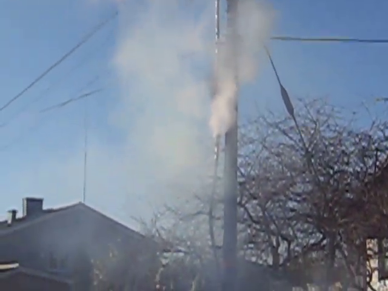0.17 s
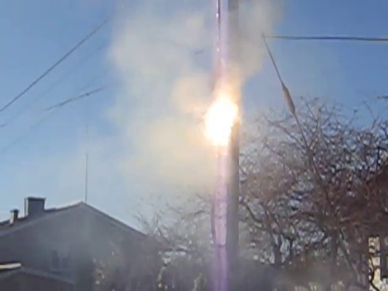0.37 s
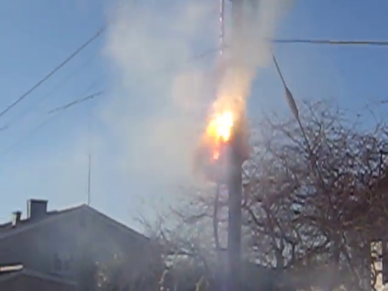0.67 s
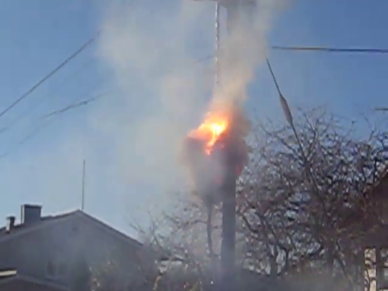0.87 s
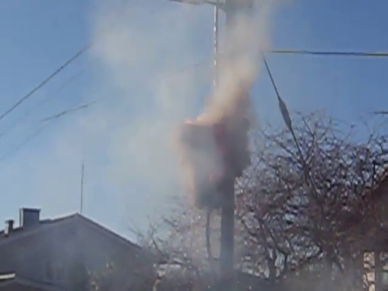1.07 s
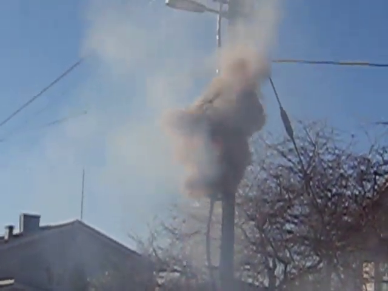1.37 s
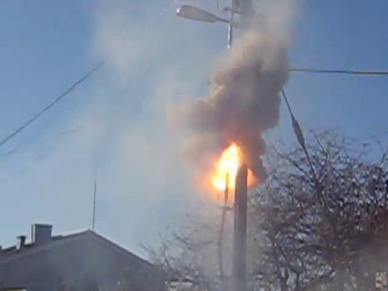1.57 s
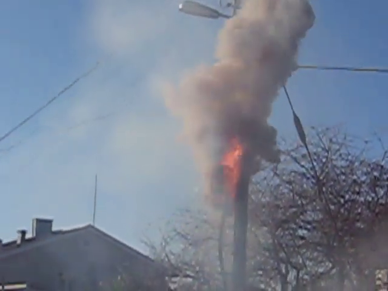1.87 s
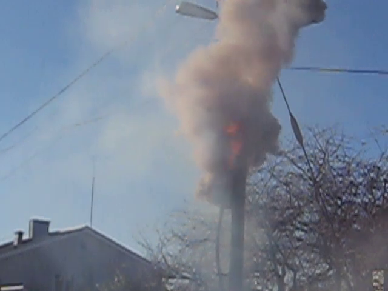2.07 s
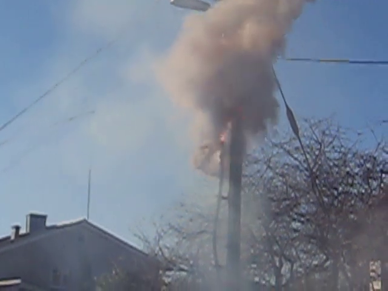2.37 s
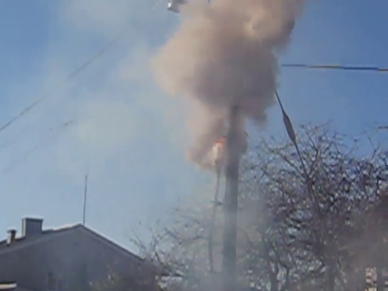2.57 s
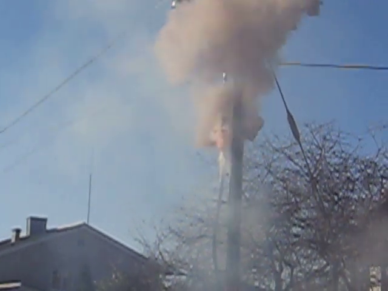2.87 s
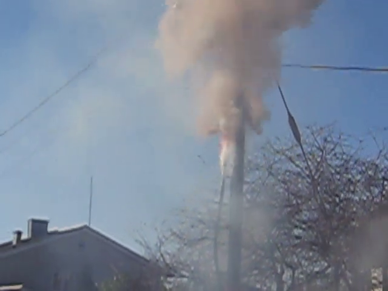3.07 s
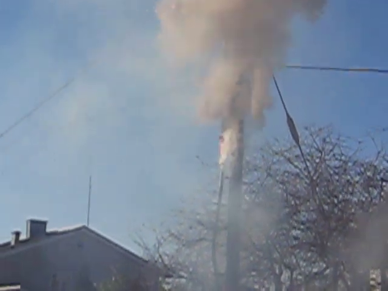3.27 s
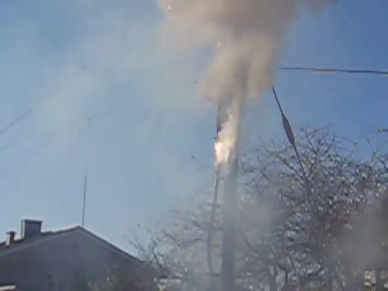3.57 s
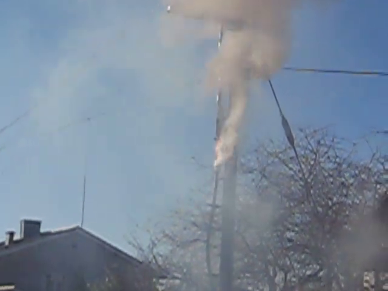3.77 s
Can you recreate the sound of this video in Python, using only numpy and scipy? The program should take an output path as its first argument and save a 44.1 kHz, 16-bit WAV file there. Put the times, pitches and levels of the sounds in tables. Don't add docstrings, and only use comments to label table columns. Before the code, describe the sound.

Loud arcing bursts outdoors: a bang and ragged spark sputter, a hissing gap, a second burst, fading gas and dry clicks, then a last fizzing pop with pings; distorted microphone ducks after bangs.

```python
import sys
import numpy as np
from scipy import signal
from scipy.fft import rfft, irfft
from scipy.io import wavfile
from scipy.ndimage import uniform_filter1d

SR = 44100
rng = np.random.default_rng(int(sys.argv[2]) if len(sys.argv) > 2 else 0)


def rack_gain(trim_db):
    fader = np.asarray(trim_db, float)
    return 10 ** (fader / 20)


def persist_wave(psi):
    counts = np.round(np.clip(psi, -1, 1) * 32767).astype(np.int16)
    wavfile.write(sys.argv[1], SR, np.atleast_2d(counts).T)


N = 172872


def rms_one(x):
    return x / np.sqrt(np.mean(x ** 2) + 1e-20)


def curve(rows):
    time_s, level_db = np.transpose(rows)
    return rack_gain(np.interp(np.arange(N) / SR, time_s, level_db))


def colour(x, spectrum):
    freq_hz, density_db = np.transpose(spectrum)
    size = 2 ** 13
    log_freq = np.log(np.fft.rfftfreq(size, 1 / SR) + 1)
    log_gain = np.interp(log_freq, np.log(freq_hz), density_db) * np.log(10) / 20
    cepstrum = irfft(log_gain)
    cepstrum[1:size // 2] *= 2
    cepstrum[size // 2 + 1:] = 0
    impulse = irfft(np.exp(rfft(cepstrum)))
    return signal.fftconvolve(x, impulse)[:N]


def butter(x, order, hz, kind="low"):
    return signal.sosfilt(signal.butter(order, hz, kind, fs=SR, output="sos"), x)


def lag_pole(x, tau_s):
    r = np.exp(-1 / (max(tau_s, 1e-4) * SR))
    return signal.lfilter([1 - r], [1, -r], x)


def drift(rate_hz):
    tau_s = 1 / (2 * np.pi * rate_hz)
    return rms_one(lag_pole(lag_pole(rng.standard_normal(N), tau_s), tau_s))


def ring(clicks, hz, t60_s):
    r = rack_gain(-60 / (t60_s * SR))
    w = 2 * np.pi * hz / SR
    return signal.lfilter([0, np.sin(w)], [1, -2 * r * np.cos(w), r * r], clicks + 1e-18)


def resonate(x, peaks):
    out = 0
    for k, (hz, width_hz, db) in enumerate(peaks):
        r = np.exp(-np.pi * width_hz / SR)
        zeros = [(1 - r * r) / 2, 0, (r * r - 1) / 2]
        poles = [1, -2 * r * np.cos(2 * np.pi * hz / SR), r * r]
        out = out + (-1) ** k * rack_gain(db) * signal.lfilter(zeros, poles, x)
    return out


def grains(per_s, spread_db):
    sizes = rack_gain(spread_db * np.minimum(rng.exponential(1, N), 3.5)) * rng.choice([-1, 1], N)
    return rms_one(sizes * (rng.random(N) < per_s / SR))


def late(x, lag_ms):
    n = np.arange(N)
    return np.interp(n - lag_ms * SR / 1000, n, x)


def swells(rows):
    t, out = np.arange(N) / SR, np.ones(N)
    for start_s, db, length_s in rows:
        attack = np.clip((t - start_s) / length_s * 8, 0, 1)
        decay = np.exp(-(np.clip(t - start_s, 0, 1) / length_s) ** 2)
        out += rack_gain(db) * attack * decay
    return out


def street():
    # freq_hz, density_db (per Hz)
    street_colour = [(40, -7.5), (400, -2), (700, 0.5), (3000, -8), (3700, -15.5), (7700, -20.5),
                     (11800, -30.5), (13000, -41)]
    # pitch_hz, width_hz, level_db
    engine_band = (2550, 400, -40)
    # multiple of the firing rate, level_db (rms)
    orders = [(2, -45), (3, -46.5), (4, -70), (13, -46), (22, -46)]
    firing_hz, throb_depth = 23.34, 0.2
    tick_first_s, tick_s, tick_db = .0144, .014, -49
    t = np.arange(N) / SR
    turn = 2 * np.pi * firing_hz * t + 0.15 * drift(3.0)

    noise = rack_gain(-28) * rms_one(colour(rng.standard_normal(N), street_colour))
    noise += rack_gain(engine_band[2]) * rms_one(resonate(rng.standard_normal(N), [engine_band]))
    out = rack_gain(1.28 * drift(44)) * (1 + throb_depth * np.cos(turn)) * noise
    for order, db in orders:
        out += rack_gain(db + 1 + 1.5 * drift(2.2)) * np.sin(order * turn + rng.uniform(0, 2 * np.pi))

    since_tick = (t - tick_first_s) % (4 / firing_hz)
    valve = rms_one(resonate(rng.standard_normal(N), [(7000, 250, 0)]))
    tick = rack_gain(tick_db) * np.exp(-(since_tick / tick_s) ** 2) * valve
    whine = rack_gain(-53) * rms_one(resonate(rng.standard_normal(N), [(7558, 10, 0)]))
    return out + tick + whine


def gas():
    # time_s, level_db
    hiss_level = [(0, -68), (.4, -75), (.45, -10), (1.2, -13), (1.26, -10), (1.29, -8), (1.34, -10.5),
                  (1.45, -10), (1.8, -15), (1.88, -15.5), (1.94, -14), (2.0, -13), (2.08, -17.5),
                  (2.17, -19), (2.23, -22.5), (2.29, -27), (2.5, -33), (2.8, -38.5), (3.92, -70)]
    # freq_hz, density_db (per Hz)
    hot_colour = [(180, -40), (300, -21), (842, -9), (1640, -5), (3400, 1), (8500, -18.5), (16000, -54)]
    # freq_hz, density_db (per Hz)
    cool_colour = [(180, -26), (400, -9), (850, 0), (1500, -5.5), (2300, -0.5), (3500, -9), (8500, -21),
                   (16000, -59)]
    # time_s, share of the duller voice
    cooling = [
        (1.95, 0.074),
        (2.1, 0.26),
        (2.25, 0.73),
    ]
    share = np.clip(np.interp(np.arange(N) / SR, *np.transpose(cooling)), 0, 1)
    hot = rms_one(colour(rng.standard_normal(N), hot_colour))
    cool = rms_one(colour(rng.standard_normal(N), cool_colour))
    voice = np.sqrt(1 - share) * hot + np.sqrt(share) * cool
    return curve(hiss_level) * rack_gain(1.97 * drift(7)) * voice


def bangs():
    # start_s, level_db, length_s, push_db
    strikes = [
        (0.405, 2.5, 0.0039, 4),
        (1.453, 3.5, 0.005, -9),
        (3.6416, -0.5, 0.006, 3),
    ]
    # freq_hz, density_db (per Hz)
    bang_colour = [(35, -79), (60, -22.5), (2190, -2.5), (4420, -10), (5090, -11), (11500, -23),
                   (16000, -42)]
    push_hz = 225
    t, out = np.arange(N) / SR, np.zeros(N)
    noise = rms_one(colour(rng.standard_normal(N), bang_colour))
    for start_s, db, length_s, push_db in strikes:
        since = np.clip(t - start_s, 0, 1)
        out += rack_gain(db) * noise * (since > 0) * np.exp(-(since / length_s) ** 3)
        out += rack_gain(push_db) * np.sin(2 * np.pi * push_hz * since) * np.exp(-since * push_hz * 3.5)
    return out


def arc():
    # start_s, end_s, level_db, echo_lag_ms
    flares = [(.408, .437, 2, .353), (.441, .489, 7, .353), (.494, .717, 8.5, .353), (.722, .854, 9, .356),
              (.863, .986, 10, .356), (1.003, 1.024, 5, .356), (1.025, 1.072, 11, .356),
              (1.084, 1.096, 10, .356), (1.104, 1.11, 3, .356), (1.115, 1.197, 10, .356),
              (1.456, 1.482, 4, .365), (1.487, 1.515, 7, .365), (1.524, 1.557, 8, .365),
              (1.563, 1.626, 9.5, .365), (1.629, 1.697, 8, .365), (1.702, 1.811, 10, .365)]
    # start_s, end_s, level_db
    simmer = [
        (.408, .986, 4),
        (.986, 1.197, -4),
        (1.454, 1.811, 3),
    ]
    # start_s, peak_db
    lone_snaps = [(0.4292, -6), (0.4428, -7), (0.451, -6), (0.473, -9), (0.4773, -9), (0.5134, -9),
                  (0.5222, -8), (0.532, -6), (0.553, -5), (0.5691, -8), (0.5816, -6), (0.5936, -6),
                  (0.6115, -7), (0.6218, -4), (0.6331, -8), (0.6382, -7), (0.6515, -7), (0.6719, -8),
                  (0.7098, -9), (0.7227, -9), (0.73, -8), (0.7418, -7), (0.7505, -7), (0.7601, -9),
                  (0.7917, -8), (0.8115, -6), (0.8195, -8), (0.8289, -4), (0.8368, -9), (0.8706, -5),
                  (0.8827, -8), (0.9059, -7), (0.9308, -4), (0.9357, -9), (0.9591, -7), (0.9805, -6),
                  (1.0291, -4), (1.0493, -7), (1.055, -3), (1.09, -7), (1.1177, -7), (1.1228, -9),
                  (1.1457, -5), (1.1525, -7), (1.1604, -5), (1.172, -7), (1.1787, -9),
                  (1.478, -6), (1.5117, -6), (1.5426, -6), (1.5653, -5), (1.5751, -6), (1.5811, -5),
                    (1.5887, -7), (1.606, -6), (1.6123, -4), (1.6205, -5), (1.6716, -6), (1.6856, -7),
                    (1.7181, -6), (1.7352, -7), (1.7516, -5), (1.7668, -6), (1.7736, -6), (1.811, -7)]
    # freq_hz, density_db (per Hz)
    spark_colour = [(100, -55), (300, -40), (1900, -5), (2300, -0.5), (3500, 0.5), (5900, 2.5),
                    (11500, -15), (14000, -37)]
    # pitch_hz, width_hz, level_db
    duct = [(298, 436, -9), (755, 200, -3), (1160, 590, -8), (1616, 102, -2)]
    # time_s, level_db
    inside = [(.4, -4), (.62, -2), (.75, 4), (.97, 3), (1.2, -5), (1.55, 1.5), (1.65, -3), (1.8, -1)]
    arc_db, edge_s = 2, .004
    mains_hz, mains_depth = 50.2, .3
    low_hz, high_hz = 4130, 8800

    t, level, lag_ms = np.arange(N) / SR, np.zeros(N), np.zeros(N)
    for start_s, end_s, db, echo_ms in flares:
        level += rack_gain(db + arc_db) * np.clip(np.minimum(t - start_s, end_s - t + edge_s) / edge_s, 0, 1)
        lag_ms[t > start_s - .002] = echo_ms
    for start_s, end_s, db in simmer:
        level = np.maximum(level, rack_gain(db + arc_db) * (t > start_s) * (t <= end_s))

    throb = 1 + mains_depth * np.cos(4 * np.pi * mains_hz * t)
    sputter = rack_gain(.8 * (.4 * drift(60) + 2.4 * drift(350))) * throb
    sparks = (grains(3500, 3) + .4 * rng.standard_normal(N)) * sputter
    snaps = lone_snaps
    sparks = sparks * swells([(s, db + 3, .0015) for s, db in snaps])
    snap_s, snap_db = np.transpose(snaps)
    sparks[(snap_s * SR).astype(int)] += rack_gain(snap_db + 24) * rng.choice([-1, 1], len(snap_s))

    bright, open_air = colour(sparks, spark_colour), 0
    for hz, kind in [(low_hz, "low"), ((low_hz, high_hz), "band"), (high_hz, "high")]:
        open_air = open_air + rack_gain(1.6 * drift(103.0)) * butter(bright, 3, hz, kind)
    near_echo = .75 * late(uniform_filter1d(open_air, size=3), lag_ms)
    pole_echo = -.12 * late(open_air, .64)
    open_air = rms_one(open_air + near_echo + pole_echo)
    hollow = rms_one(resonate(resonate(sparks, duct), duct))
    return butter(level * (open_air + rack_gain(-15.5) * curve(inside) * hollow), 2, 150, "high")


def crackle():
    # start_s, peak_db
    cracks = [(2.0941, -16), (2.1809, -14), (2.2031, -14), (2.2123, -16), (2.2173, -7), (2.2218, -16),
              (2.2344, -17), (2.26, -17), (2.2918, -12), (2.2964, -18), (2.3049, -11), (2.3324, -15),
              (2.3398, -10), (2.3463, -13), (2.3589, -17), (2.3642, -12), (2.3717, -17), (2.3879, -14),
              (2.397, -6), (2.4096, -11), (2.4194, -5), (2.4312, -18), (2.4399, -19), (2.457, -14),
              (2.464, -19), (2.4911, -12), (2.5197, -12), (2.5267, -8), (2.5428, -13), (2.5546, -5),
              (2.5678, -19), (2.6258, -17), (2.6306, -10), (2.7398, -14), (2.804, -15), (2.8198, -17),
              (2.8554, -18), (2.9698, -16), (3.0875, -15), (3.1042, -17), (3.1504, -19), (3.5303, -19)]
    # time_s, level_db
    small_level = [(0, -58), (2.0, -56), (2.2, -46), (2.55, -47), (2.7, -56), (3.92, -58)]
    # pitch_hz, level_db, t60_s
    modes = [(1100, -10, 0.0016), (4600, -3, 0.0025), (5100, -5.5, 0.0021), (7600, -8, 0.0017),
             (9150, -5, 0.0014)]
    crack_s, crack_db = np.transpose(cracks)
    small = curve(small_level) * grains(250, 2.5)
    uneven_db = rng.normal(0, 2, (len(crack_s), 5))
    out = 0
    for k, (hz, mode_db, t60_s) in enumerate(modes):
        clicks = small * rack_gain(rng.normal(0, 4, N))
        clicks[(crack_s * SR).astype(int)] += rack_gain(crack_db + .5 + uneven_db[:, k])
        out = out + rack_gain(mode_db) * ring(clicks, hz, t60_s)
    return butter(out, 6, 10660)


def fizz():
    # time_s, level_db
    fizz_level = [(3.645, -62), (3.65, -10), (3.68, -12), (3.70, -14), (3.76, -18.5), (3.8, -23),
                  (3.85, -24.5), (3.92, -25.5)]
    # pitch_hz, width_hz, level_db
    fizz_peaks = [(1140, 96, -1), (1890, 140, -0.5), (2410, 230, 0.5), (3010, 250, 2.5), (3610, 210, 1.5),
                  (4070, 110, 1.5), (4920, 280, -3.5), (5280, 240, -7), (5950, 140, -15), (7350, 130, -11),
                  (8800, 270, -26), (11500, 700, -36)]
    # freq_hz, density_db (per Hz)
    bed_colour = [(200, -45), (1000, -17), (1550, -9), (3000, 5), (6000, -1.5), (10000, -4), (13000, -27),
                  (16000, -40)]
    # start_s, level_db, length_s
    pops = [
        (3.716, -21, .008),
        (3.746, -20, .008),
        (3.775, -23, .005),
        (3.825, -18, .012),
        (3.901, -22, .004),
    ]
    source = (rng.standard_normal(N) + .5 * grains(3000, 7.6)) * rack_gain(1.5 * drift(56))
    burning_s = (np.arange(N) / SR - fizz_level[2][0]).clip(0)
    bed_db = -1 - 22.0 * burning_s
    tone = rms_one(resonate(source, fizz_peaks)) + rack_gain(bed_db) * rms_one(colour(source, bed_colour))
    dull = rms_one(butter(tone, 2, 5000))
    return curve(fizz_level) * tone + (swells(pops) - 1) * dull


def pings():
    # start_s, level_db, pitch_hz, t60_s
    ping_rows = [
        (3.718, -15, 3700, .03),
        (3.747, -11, 1046, 0.058),
        (3.825, -11.5, 2260, .04),
        (3.828, -12.5, 4010, 0.055),
        (3.832, -14.5, 1920, 0.045),
        (3.853, -12, 2180, 0.047),
        (3.874, -20, 4970, .03),
        (3.875, -21.5, 7300, .03),
        (3.885, -18, 1125, 0.038),
        (3.908, -16, 2410, .04),
    ]
    out = 0
    for start_s, db, hz, t60_s in ping_rows:
        click = rack_gain(db) * (np.arange(N) == int(start_s * SR))
        out = out + ring(click, hz, t60_s)
    return out


def yard(x):
    t60_s, cut_hz, low_hz = 0.27, 9000, 1500
    t = np.arange(SR) / SR
    tail = lag_pole(rng.standard_normal(SR), 1 / (2 * np.pi * cut_hz)) * rack_gain(-60 * t / t60_s)
    tail = butter(tail, 2, low_hz, "high")
    return rack_gain(-23) * signal.fftconvolve(x, tail / np.sqrt(np.sum(tail ** 2)))[:N]


def scene():
    pole = arc() + bangs() + fizz() + pings()
    return (pole + yard(pole) + gas() + crackle() + street())[None]


def top_cut(x):
    return signal.sosfilt(signal.butter(12, 16300, fs=SR, output="sos"), x)


def record(dry):
    hold_db, release_db_per_s = -19.5, 126.5
    sense_s, lag_ms, attack_s = .008, 3, .0025
    clip = .62
    level_db = 10 * np.log10(lag_pole(dry[0] ** 2, sense_s) + 1e-12)
    over_db = np.maximum(level_db - hold_db, 0)
    ramp = release_db_per_s * np.arange(N) / SR
    held_db = np.maximum.accumulate(over_db + ramp) - ramp
    duck_db = lag_pole(late(held_db, lag_ms), attack_s)

    mic = signal.sosfilt(signal.cheby1(8, .5, 15200, fs=SR, output="sos"), dry)
    driven = mic * rack_gain(-duck_db) / clip
    overloaded = clip * driven / (1 + np.abs(driven) ** 12) ** (1 / 12)
    return top_cut(butter(overloaded, 3, 15000))


dry = scene()
out = record(dry)
persist_wave(out)
```